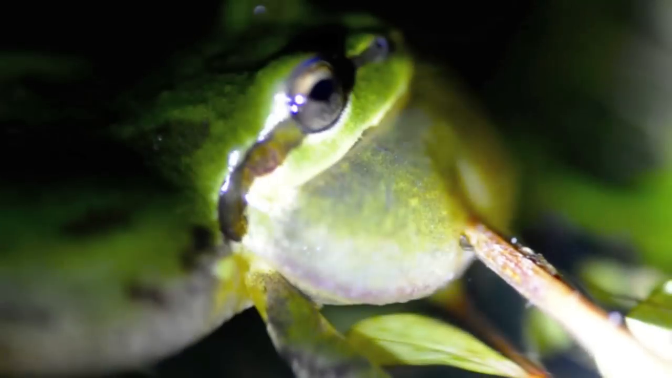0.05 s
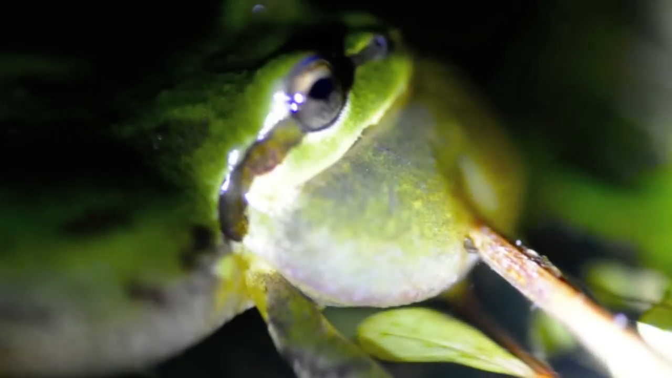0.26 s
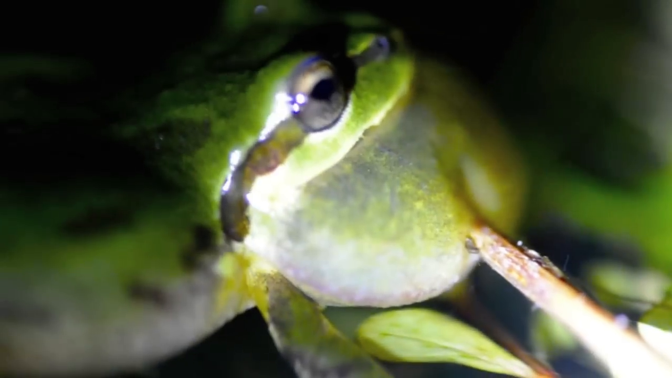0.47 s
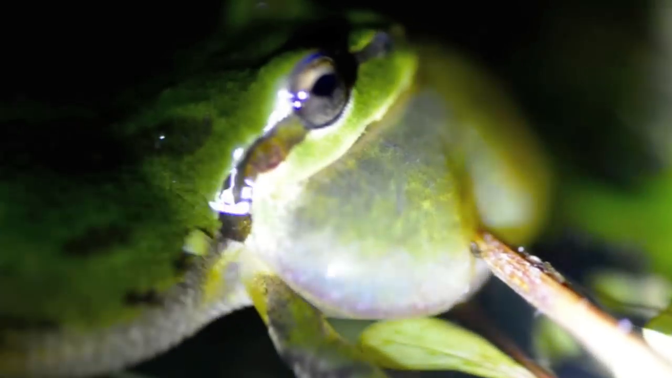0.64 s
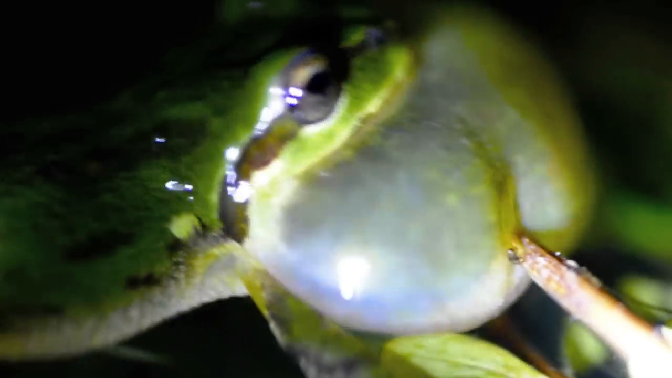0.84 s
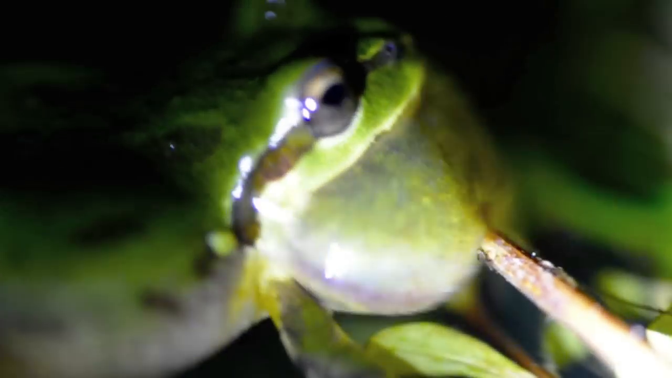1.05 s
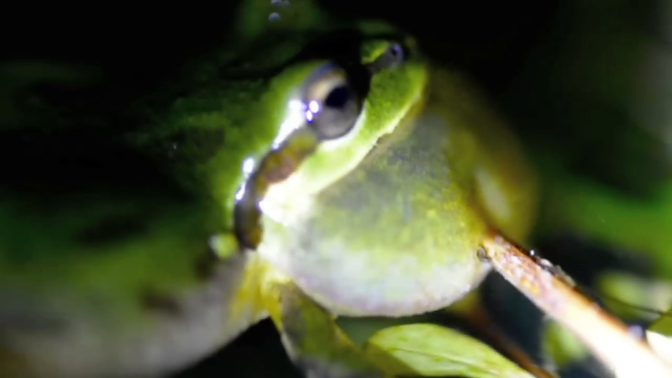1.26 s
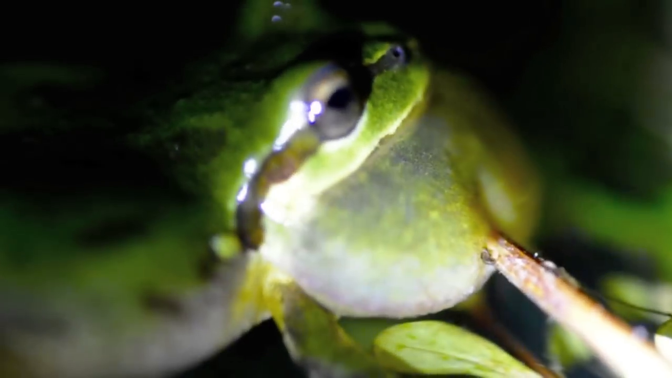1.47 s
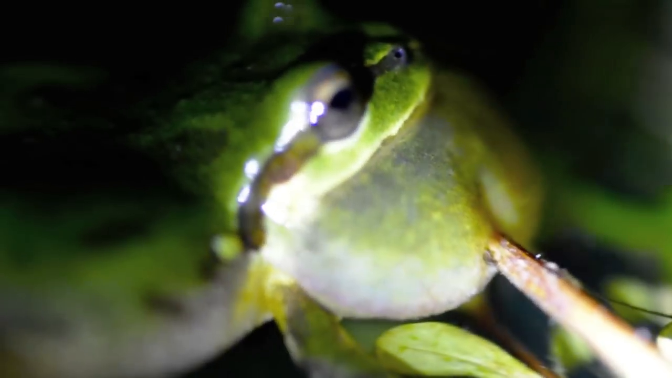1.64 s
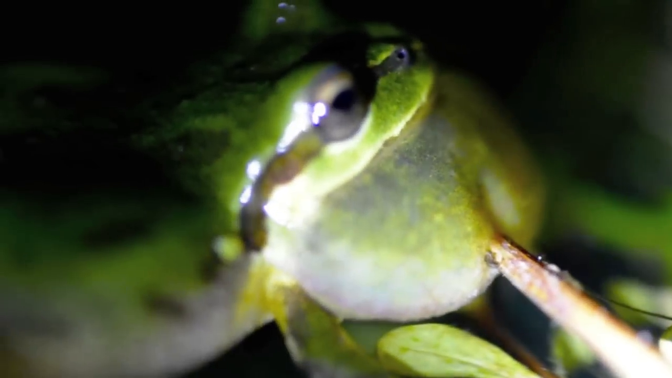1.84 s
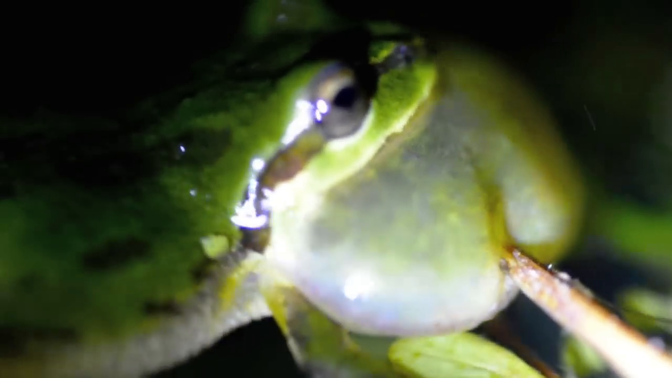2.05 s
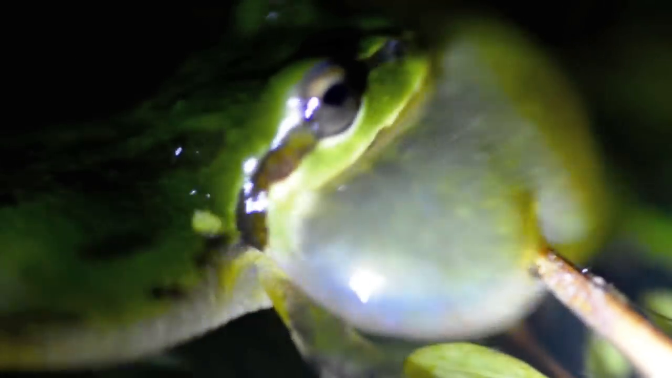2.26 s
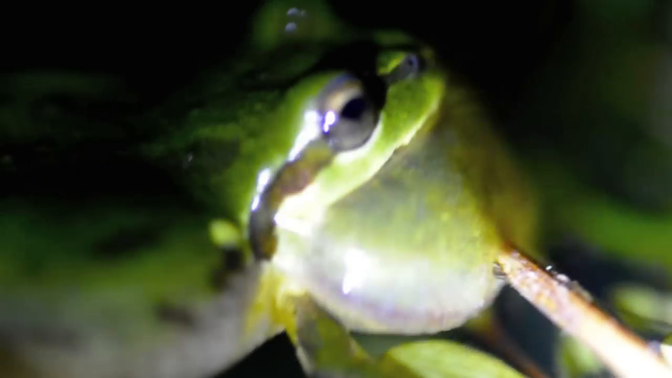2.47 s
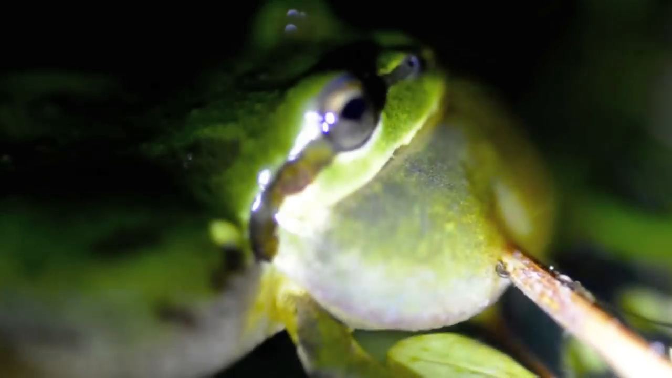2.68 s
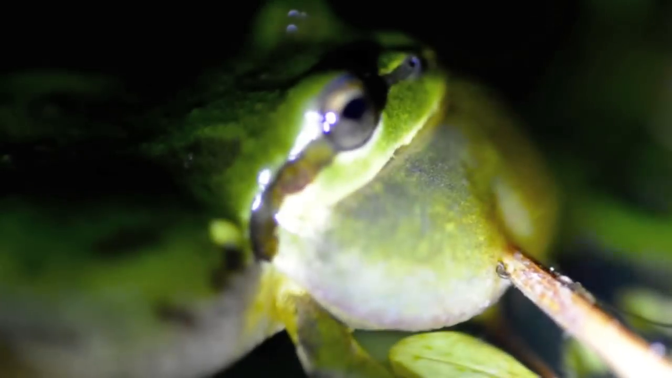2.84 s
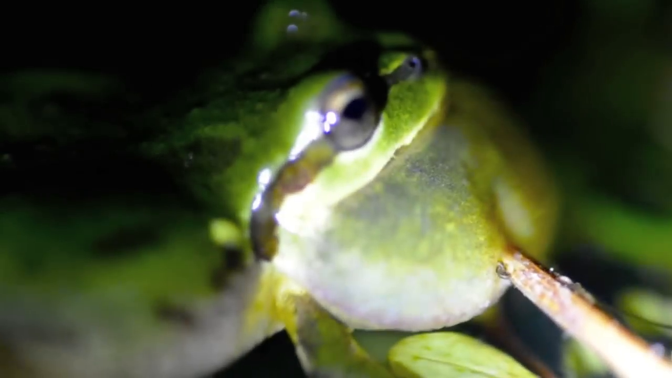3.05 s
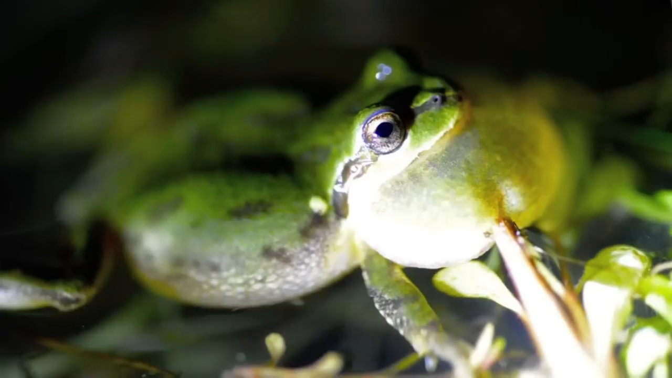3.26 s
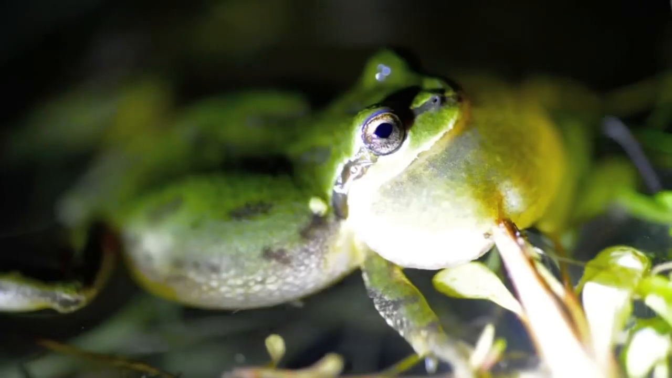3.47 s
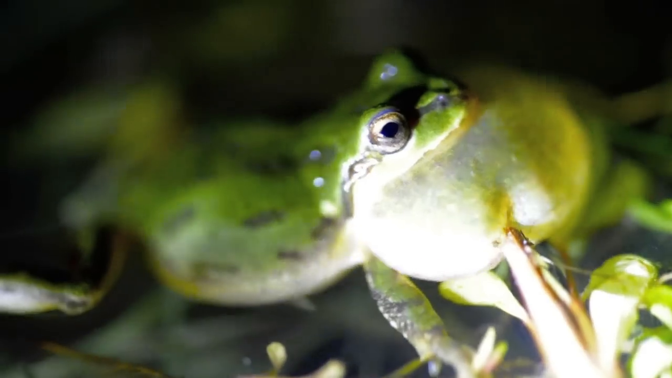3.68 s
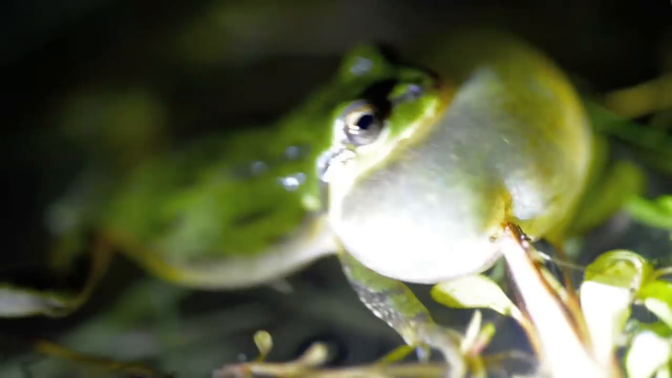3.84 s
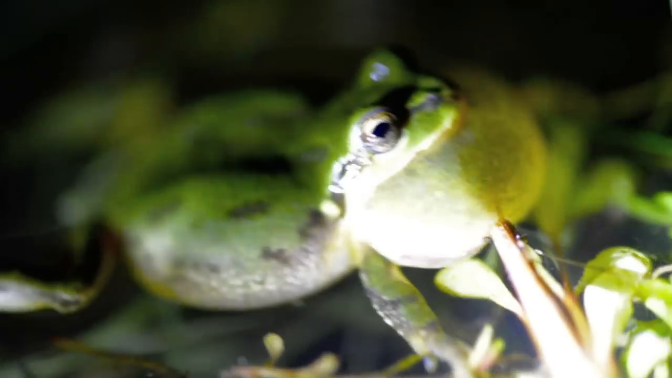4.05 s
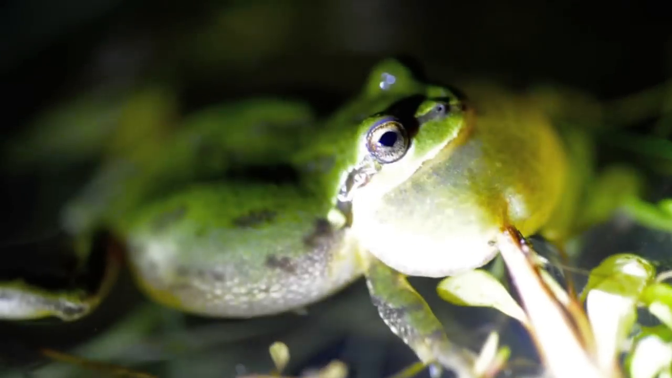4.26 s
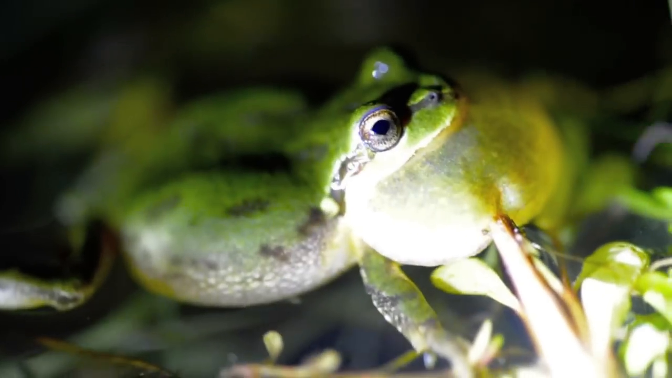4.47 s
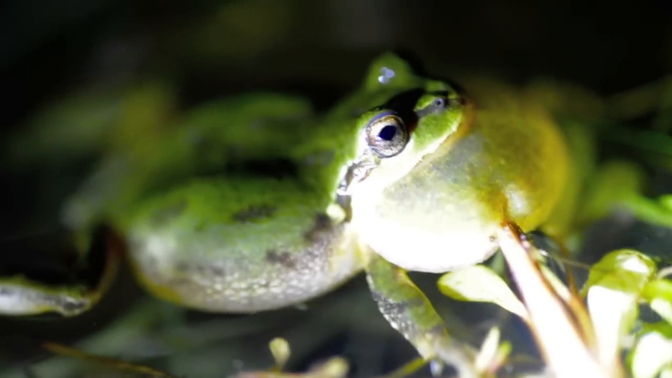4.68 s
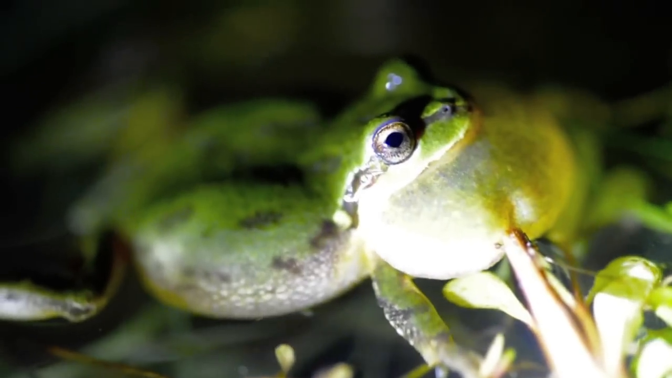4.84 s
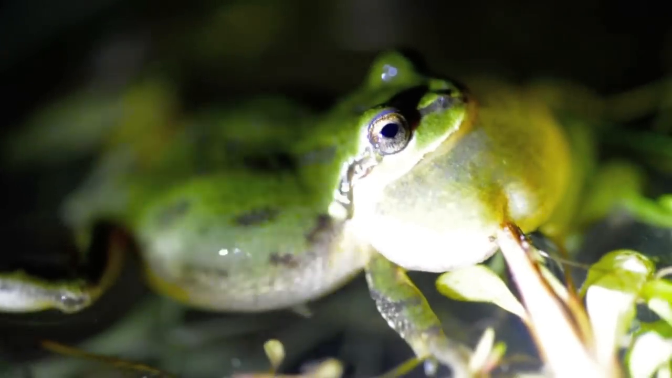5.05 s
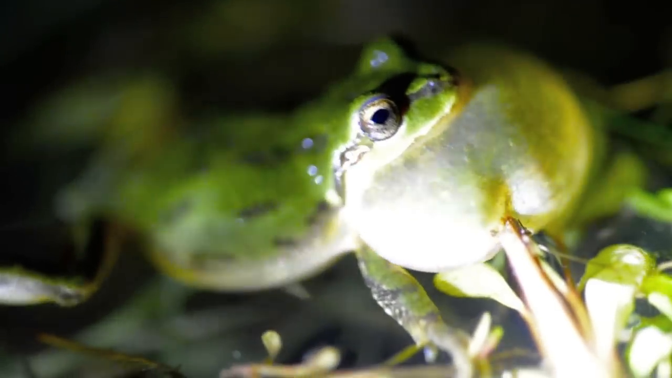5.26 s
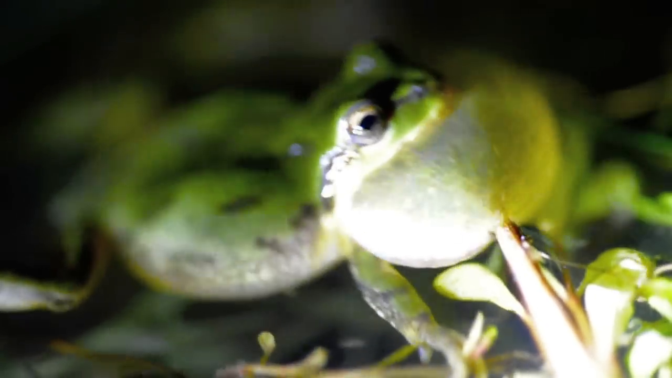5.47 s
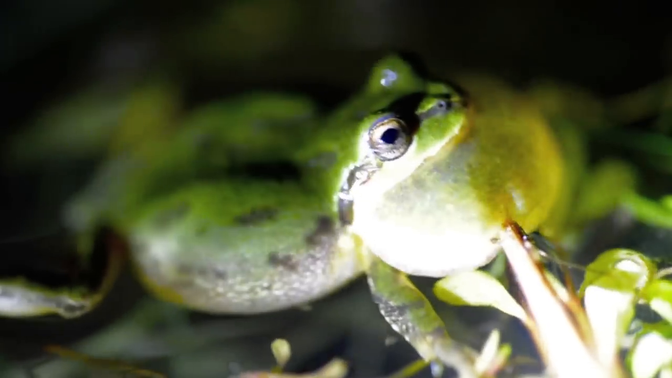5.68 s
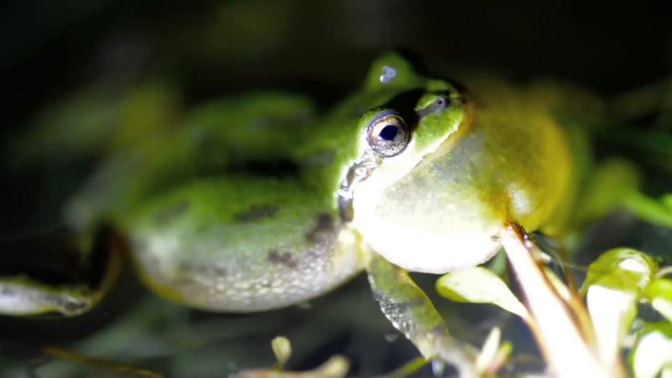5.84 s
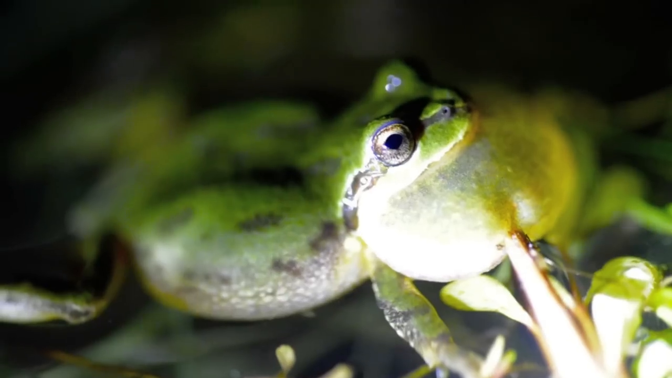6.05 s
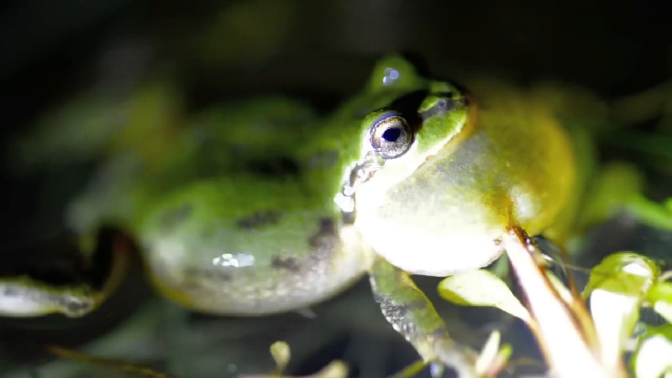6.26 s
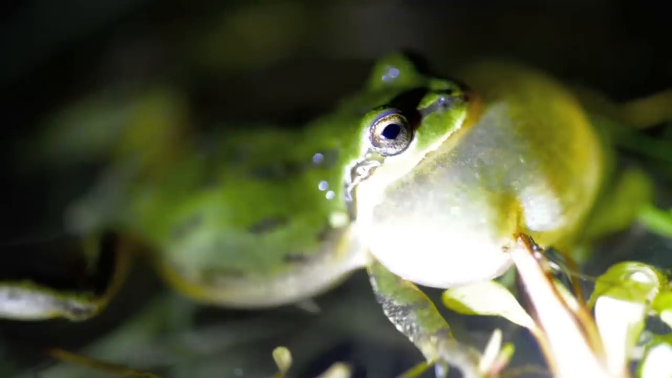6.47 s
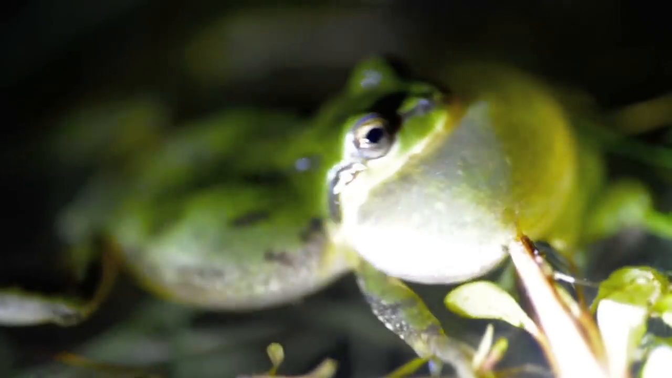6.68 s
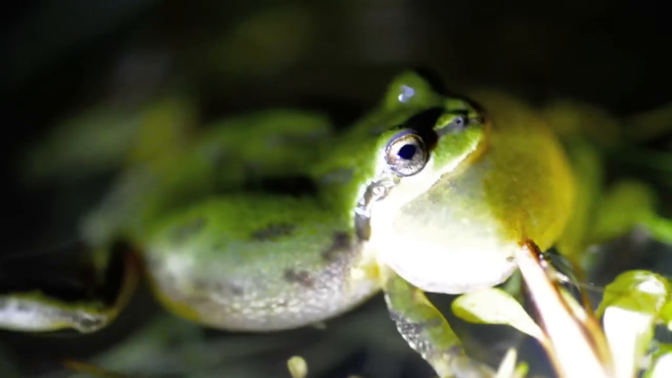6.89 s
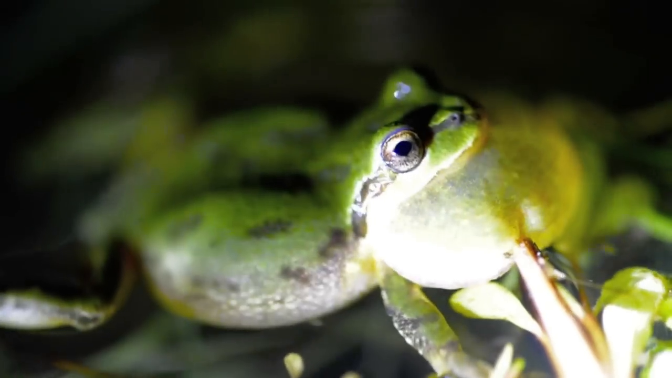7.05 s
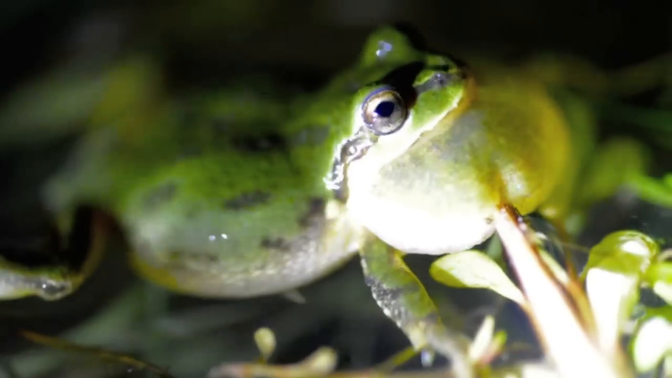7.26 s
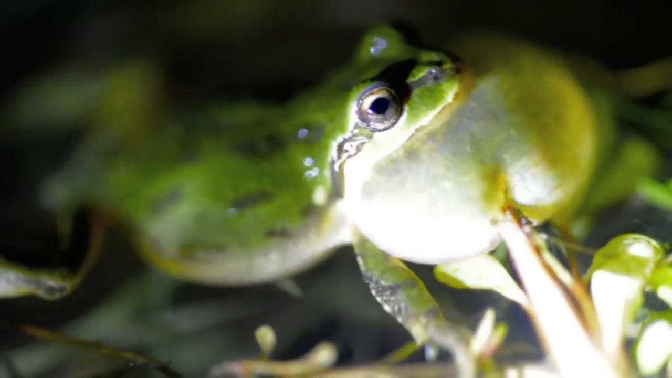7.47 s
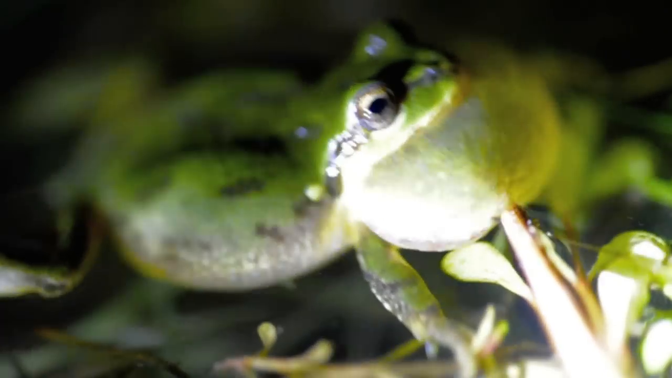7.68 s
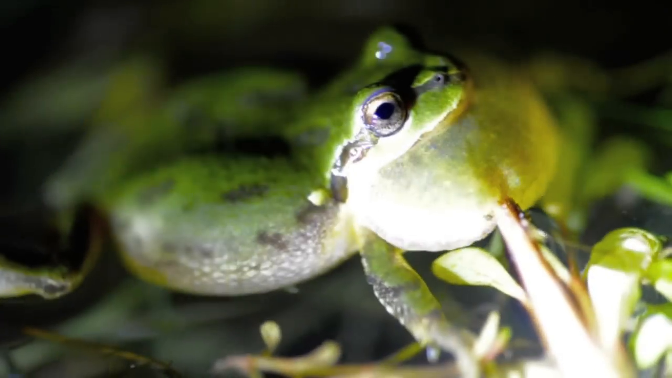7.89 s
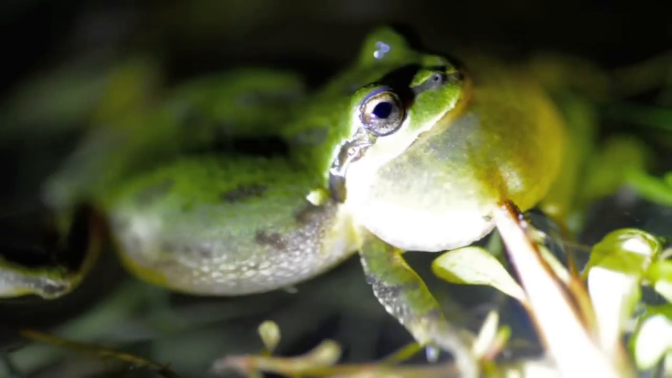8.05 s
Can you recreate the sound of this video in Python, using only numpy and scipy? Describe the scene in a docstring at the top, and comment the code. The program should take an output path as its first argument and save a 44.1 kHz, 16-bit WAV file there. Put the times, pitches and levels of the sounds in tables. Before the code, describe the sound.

Six short, rasping croaks from a nearby tree frog stand out against a pond full of calling frogs.

```python
"""A dense night chorus of frogs fills a pond, and one tree frog croaks six times right at the microphone.
Each croak is about 80 throat pulses a second that ring the vocal sac (the throat pouch) as pitch climbs.
Behind the frogs are a blurred wash of noise, a faint electronic whistle and a thin whine now and then.
The recorder's gain control turns the chorus down under each near croak, and the strongest pulses
overload it. Twice the level dips briefly."""
import sys
import numpy as np
from scipy import signal
from scipy.fft import rfft, irfft
from scipy.io import wavfile
from scipy.ndimage import uniform_filter1d

SR = 44100
rng = np.random.default_rng(int(sys.argv[2]) if len(sys.argv) > 2 else 0)


def waveform_to_disk(signal):
    """Save audio, clipped to [-1, 1], as 16-bit WAV at the path in sys.argv[1]."""
    frames = np.transpose(np.atleast_2d(signal))
    scaled = np.clip(frames, -1, 1) * 32767
    samples = np.round(scaled).astype(np.int16)
    wavfile.write(sys.argv[1], SR, samples)


N = 358091

# How a croak swells. Each row: share of the croak from 0 to 1, level in dB before scaling by `swell`.
CROAK_SWELL = [(0, -19), (.11, -12.5), (.2, -7), (.34, -2.5), (.6, -3.5), (.85, -2.5), (1, -2.5)]
# A pulse's overtones. Each row: multiple of the low body tone, level in dB, ring time in milliseconds.
OVERTONES = [(3.23, -21, 1.55), (4.33, -43.5, 2.4), (5.38, -47.5, 1.5)]
# The tone colour of the whole pond. Each row: frequency in Hz, relative level in dB.
WASH_COLOUR = [(20, -59), (40, -40), (340, -32), (650, -34.5), (870, -3.5), (1250, -5.5), (1560, -37),
               (2000, 7), (2400, -13.5), (2850, -26.5), (3400, -35), (4600, -30.5), (7000, -44.5),
               (10000, -58), (12000, -71.5)]
# Croaks a few steps away. Each row: start in seconds, level in dB, starting sac pitch in Hz.
NEIGHBOUR_CROAKS = [(-.052, -3.5, 1980), (.165, -6.5, 2190), (.228, 1.5, 2010), (1.068, -1, 2031),
                    (1.311, -2, 2002), (1.626, -0.5, 1920), (1.778, -3, 2060), (2.28, -3, 1944),
                    (2.565, 1, 1948), (2.73, -2.5, 1920), (2.9, 1, 1998), (3.141, -15, 2505),
                    (3.34, -4.5, 2050), (3.9, -6, 2020), (4.26, -.5, 1855), (4.424, -1, 2184),
                    (4.719, -1.5, 2013), (4.814, 0, 1948), (5.445, 0.5, 1967), (5.857, -4, 1903),
                    (6.009, -2, 1888), (6.079, -13.5, 2500), (6.176, -0.5, 2063), (6.702, -13.5, 2255),
                    (6.811, -3, 2014), (7.05, -5, 2095), (7.11, -5, 2060), (7.692, -2, 1963),
                    (7.971, 1, 1950)]
# The near frog's croaks. Each row: first and last pulse in seconds, starting and ending sac pitch in Hz,
# snap level in dB, microphone place (row 0 or 1 of MIC_PLACES).
NEAR_CROAKS = [(0.6299, 0.879, 1853, 2198, -27, 0), (2.0021, 2.2636, 1850, 2220, -26, 0),
               (3.6177, 3.8775, 1870, 2223, -30.5, 1), (5.1308, 5.3927, 1850, 2234, -31.5, 1),
               (6.3567, 6.6151, 1922, 2205, -33.5, 1), (7.3213, 7.567, 1870, 2154, -30, 1)]
# The near frog from each microphone place. Each row: body tone level in dB, pulse rise in milliseconds,
# roughness from 0 to 1, overtone boost in dB.
MIC_PLACES = [(-1, 1.43, 0.21, 3), (-7.5, 2.04, 0, 3.5)]
# When the thin whine sounds. Each row: start in seconds, end in seconds.
WHINE_TIMES = [(1.165, 2.595), (4.325, 5.765)]
# How the whine slides. Each row: share of its length from 0 to 1, pitch in Hz.
WHINE_SLIDE = [(0, 14330), (.04, 14190), (.17, 14145), (1, 14257)]
# Brief dips in level. Each row: lowest moment in seconds, fall and rise in seconds, depth in dB.
LEVEL_DIPS = [(3.262, 0.038, 0.064, -60), (7.261, 0.076, 0.012, -37)]

PULSE_MS, PACE_SPREAD = 12.45, .06  # usual pulse spacing; share by which other frogs stray from it
CLIMB = 1.14  # other frogs' ending pitch over their starting pitch
QUICK_CLIMB = 0.42  # share of the pitch climb made in the first pulses
BODY_RATIO = 0.4083  # the body tone starts at this share of the ending sac pitch
CROWD_CROAKS_PER_S = 32
CROWD_DB, WASH_DB, NEAR_DB = -18.2, -26, 18  # gains going into the mix
LEAK_DB = -31  # close up, a little bass of the near frog gets through
WHISTLE_HZ, WHISTLE_DB, WHINE_DB = 15670, -64.5, -66.5
SAC_LOW_HZ, SAC_TOP_HZ, RECORDER_TOP_HZ = 983, 10400, 15830
DUCK_ABOVE_DB, RECOVER_DB_PER_S, BEND_DB = -11.91, 60.0, -45.5


def gain_of(db):
    """Turns decibels into a number to multiply by."""
    return 10 ** (np.asarray(db) / 20)


def evened(x):
    """Scales a sound to an average (rms) level of 1."""
    return x / np.sqrt(np.mean(x ** 2) + 1e-20)


def read(points, at):
    """Joins table rows by straight lines."""
    return np.interp(at, *np.transpose(points))


def add(mix, start_s, sound):
    """Mixes a sound into a track that begins one second early."""
    part = mix[round((start_s + 1) * SR):][:len(sound)]
    part += sound[:len(part)]


def croak(spacing_ms, start_hz, end_hz, body_db, snap_db, squeak_hz, squeak_db, swell, wobble_db,
          rise_ms, count=21, body_spread=0.063, boost_db=0, rough=0.099):
    """Throat pulses ring the sac and body; late ones are rounder, higher and lose their body tone."""
    ms = np.arange(640)[None] / SR * 1000  # time inside one pulse
    number = np.arange(count)[:, None]  # one row for each pulse
    share = number / (count - 1)
    late = np.clip((share - .8) / 0.27, 0, 1)
    detune, loud, lag, shrill = rng.standard_normal((count, 4)).T[..., None]
    # the pitch jumps up, holds, then lifts at the end
    jump = 1 - np.exp(-share / 0.11)
    glide = QUICK_CLIMB * jump + (1 - QUICK_CLIMB) * share ** 2.15
    sac_hz = (start_hz + (end_hz - start_hz) * glide) * (1 + 0.0078 * detune)
    body_hz = BODY_RATIO * end_hz * (1 + body_spread * rng.standard_normal())
    turn = 2 * np.pi * ms / 1000  # phase of a 1 Hz tone
    body_phase = turn * body_hz * (1 + 0.064 * jump + 0.11 * share ** 4)
    noise = rng.standard_normal((count, ms.size))
    rasp = evened(signal.fftconvolve(noise, np.hanning(50)[None], "same"))
    rise = 1 - np.exp(-(ms / (rise_ms + 1.88 * late)) ** 2)
    sac_ring = rise * np.exp(-ms / (1.52 + rise_ms + 3.17 * late))
    pulse = sac_ring * np.sin(turn * sac_hz + rough * rasp) * (1 + .05 * rasp)
    body_ring = (1 - np.exp(-ms / 0.95)) * np.exp(-ms / 5.0)
    pulse += gain_of(body_db - 6.4 * share - 4.8 * late) * body_ring * np.sin(body_phase)
    for multiple, db, ring_ms in OVERTONES:
        ring = 2 * rise * np.exp(-ms / (ring_ms + late))
        pulse += gain_of(db + boost_db) * ring * np.sin(multiple * body_phase + 0.5 * rasp)
    # a faint rough squeak and a higher companion slide down through the croak
    squeak_phase = turn * squeak_hz * (1 - 0.11 * share + .008 * shrill)
    squeak = np.sin(squeak_phase + 0.67 * rasp) + gain_of(-11.5) * np.sin(1.5 * squeak_phase)
    pulse += gain_of(squeak_db + 2.7 * shrill + 4.0 * late) * rise * np.exp(-ms / 2.63) * squeak
    # the vocal folds open with a noisy snap
    hiss = uniform_filter1d(rng.standard_normal(pulse.shape), size=4, axis=1)
    snap = signal.lfilter([1], [1, -.8], hiss)
    pulse += gain_of(snap_db - 3.0 * share - 21.0 * late) * 2 * ms * np.exp(-ms / 0.7) * snap
    # later on, strong and weak pulses take turns
    strong = (1 - 2 * ((count - number) % 2)) * np.sin(np.pi * share ** 2)
    pulse *= gain_of(swell * read(CROAK_SWELL, share) + 0.93 * strong + wobble_db * loud)
    pulse *= np.cos(np.pi * ms / ms.max() / 2) ** .5  # fade each tail
    start_ms = number * spacing_ms + (.25 * lag - .3 * strong - 2.243 * late)
    starts = np.maximum(start_ms * SR / 1000, 0).astype(int)
    out = np.zeros(round((count * spacing_ms + 30) * SR / 1000))
    np.add.at(out, starts + np.arange(ms.size), pulse)
    return out


def pond_echoes(x, fade_s, echo_db):
    """Adds scattered echoes from banks and reeds that die down by 60 dB in fade_s seconds."""
    echoes = np.zeros(SR // 2)
    at = np.arange(200, len(echoes) - 20, 20)
    strengths = rng.choice([-1., 1.], len(at)) * gain_of(-60 * at / SR / fade_s)
    echoes[at + rng.integers(0, 20, len(at))] = strengths
    return x + gain_of(echo_db) * signal.oaconvolve(x, echoes / np.linalg.norm(echoes))[:len(x)]


def far_crowd():
    """Many far frogs croak at random moments and pitches, smeared by echoes."""
    out = np.zeros(N + SR)
    span_s = N / SR + .5
    for when, faint, pitch, pace, high in rng.random((round(CROWD_CROAKS_PER_S * span_s), 5)):
        hz = 1830 + 400 * pitch
        spacing_ms = PULSE_MS * (1 + PACE_SPREAD * (2 * pace - 1))
        sound = croak(spacing_ms, hz, CLIMB * hz, body_db=-12.5, snap_db=-32.5,
                      squeak_hz=8000 + 2400 * high, squeak_db=-35.5,
                      swell=0.73, wobble_db=0, rise_ms=1.46)
        add(out, when * span_s - .5, gain_of(-9 * faint) * sound)
    return gain_of(CROWD_DB) * evened(pond_echoes(out, fade_s=0.94, echo_db=-7.5)[SR:])


def pond_wash():
    """The whole pond blurs into one steady noise."""
    hz = np.fft.rfftfreq(N, 1 / SR)
    colour_db = read([(np.log(f), db) for f, db in WASH_COLOUR], np.log(hz + 1))
    spectrum = rfft(rng.standard_normal(N)) * gain_of(colour_db)
    return gain_of(WASH_DB) * evened(irfft(spectrum, N))


def neighbour_frogs():
    """Frogs a few steps away, each croak still distinct."""
    out = np.zeros(N + SR)
    quirks = rng.uniform(-1, 1, (len(NEIGHBOUR_CROAKS), 2))
    for (start, db, hz), (pace, high) in zip(NEIGHBOUR_CROAKS, quirks):
        sound = croak(PULSE_MS * (1 + PACE_SPREAD * pace), hz, CLIMB * hz, body_db=-11.5, snap_db=-28,
                      squeak_hz=8600 + 900 * high, squeak_db=-34.5, swell=0.4, wobble_db=2, rise_ms=1.77)
        add(out, start, gain_of(db) * sound)
    return pond_echoes(out, fade_s=0.22, echo_db=-9.5)[SR:]


def electronics():
    """A steady electronic whistle, and a sliding whine that comes and goes."""
    t = np.arange(N) / SR
    out = gain_of(WHISTLE_DB) * np.sin(2 * np.pi * WHISTLE_HZ * t)
    for start, end in WHINE_TIMES:
        hz = read(WHINE_SLIDE, (t - start) / (end - start))
        on = np.clip(np.minimum(t - start, end - t) / .008, 0, 1)
        out += gain_of(WHINE_DB) * on * np.sin(2 * np.pi * np.cumsum(hz) / SR)
    return np.sqrt(2) * out


def near_frog():
    """The frog at the microphone, loud and with hardly any echo."""
    out = np.zeros(N + SR)
    for first, last, start_hz, end_hz, snap_db, place in NEAR_CROAKS:
        length_ms = (last - first) * 1000
        gaps = round(length_ms / PULSE_MS)
        body_db, rise_ms, rough, boost_db = MIC_PLACES[round(place)]
        sound = croak(length_ms / gaps, start_hz, end_hz, body_db, snap_db,
                      squeak_hz=10000, squeak_db=-37, swell=0.99, wobble_db=0.94, rise_ms=rise_ms,
                      count=gaps + 1, body_spread=0, boost_db=boost_db, rough=rough)
        add(out, first, gain_of(NEAR_DB) * sound)
    return pond_echoes(out, fade_s=0.034, echo_db=-17.5)[SR:]


def sac_and_air(x):
    """The small sac gives off little bass, and air and skin soak up the highest treble."""
    bass_cut = signal.butter(6, SAC_LOW_HZ, "high", fs=SR, output="sos")
    treble_cut = signal.butter(4, SAC_TOP_HZ, "low", fs=SR, output="sos")
    return signal.sosfilt(np.vstack([bass_cut, treble_cut]), x)


def scene():
    """Mixes the frogs, the wash and the electronics into one channel."""
    near = near_frog()
    frogs = sac_and_air(near + neighbour_frogs() + far_crowd()) + gain_of(LEAK_DB) * near
    return (frogs + pond_wash() + electronics())[None]


def record(dry):
    """The recorder turns loud moments down, overloads on peaks and cuts the top; the level dips twice."""
    t = np.arange(N) / SR
    power = signal.oaconvolve(dry[0] ** 2, np.ones(560) / 560)[:N]
    level_db = 10 * np.log10(abs(power) + 1e-12)
    # gain control reacts a little late, then recovers steadily
    recovery_db = RECOVER_DB_PER_S * t
    held_db = np.maximum.accumulate(level_db + recovery_db) - recovery_db
    over_db = np.maximum(held_db - DUCK_ABOVE_DB, 0)
    lag = np.exp(-1 / (0.0063 * SR))
    ducked = dry / gain_of(1.014 * signal.lfilter([1 - lag], [1, -lag], over_db))
    # the microphone bends the wave slightly, so each pulse leaves a low bump
    bumps = signal.sosfilt(signal.butter(1, 40, "high", fs=SR, output="sos"), ducked ** 2)
    out = np.clip(ducked + gain_of(BEND_DB) * bumps, -.965, .965)  # overload
    for at, fall_s, rise_s, db in LEVEL_DIPS:
        out *= np.interp(t, [at - fall_s, at, at + rise_s], [1, gain_of(db), 1])
    treble_cut = signal.firwin(511, RECORDER_TOP_HZ, window=("kaiser", 9), fs=SR)
    return signal.oaconvolve(out, treble_cut[None], "same")


dry = scene()
out = record(dry)
waveform_to_disk(out)
```